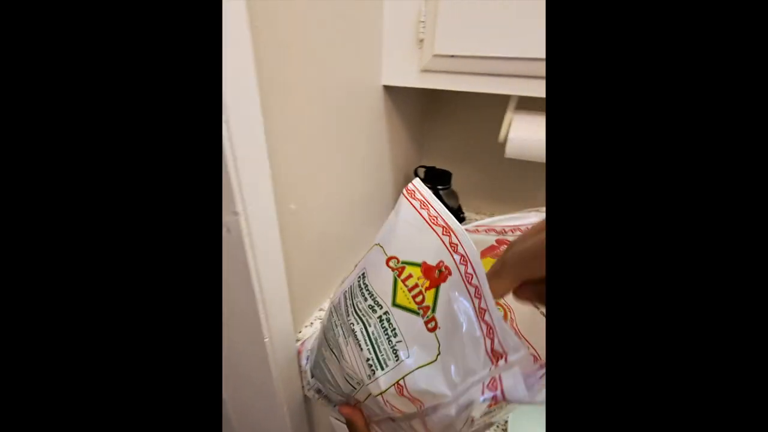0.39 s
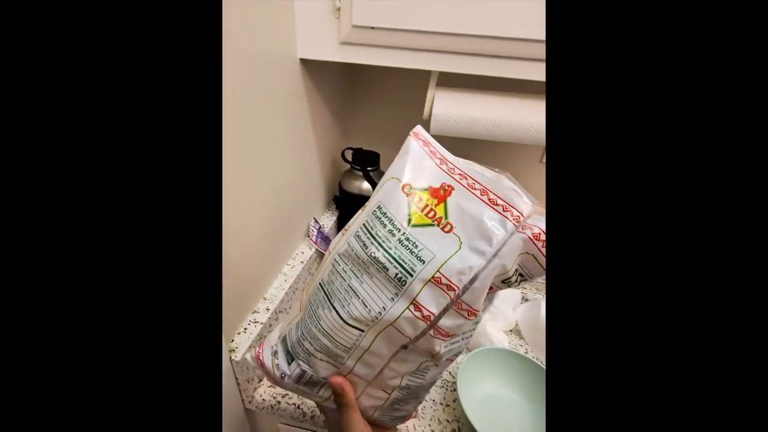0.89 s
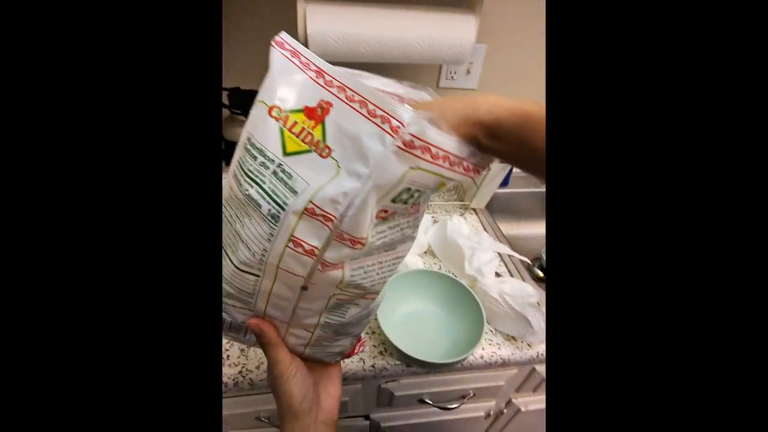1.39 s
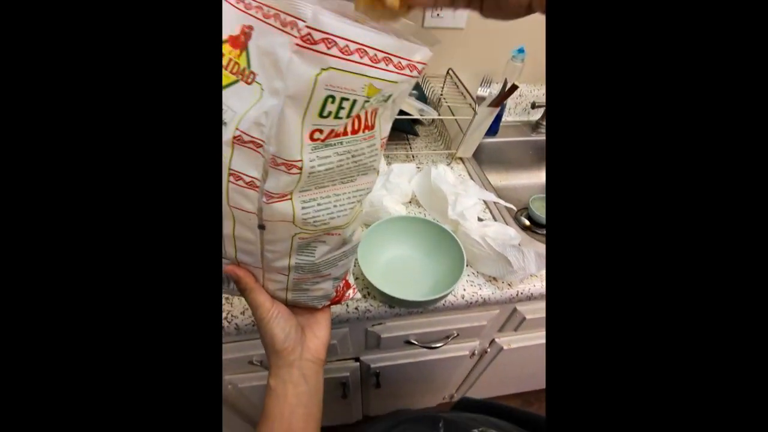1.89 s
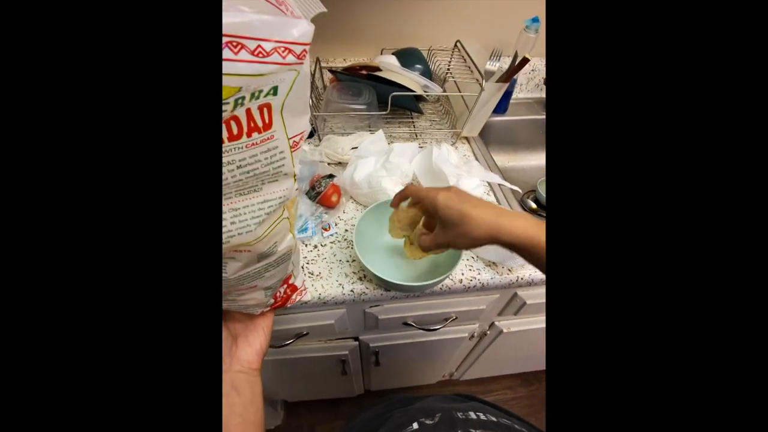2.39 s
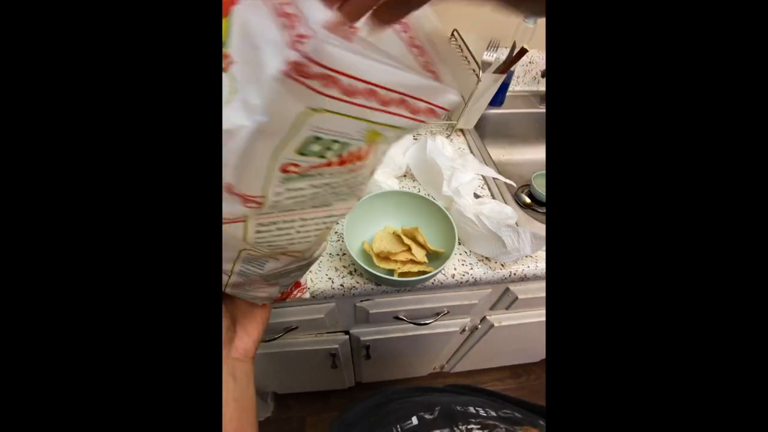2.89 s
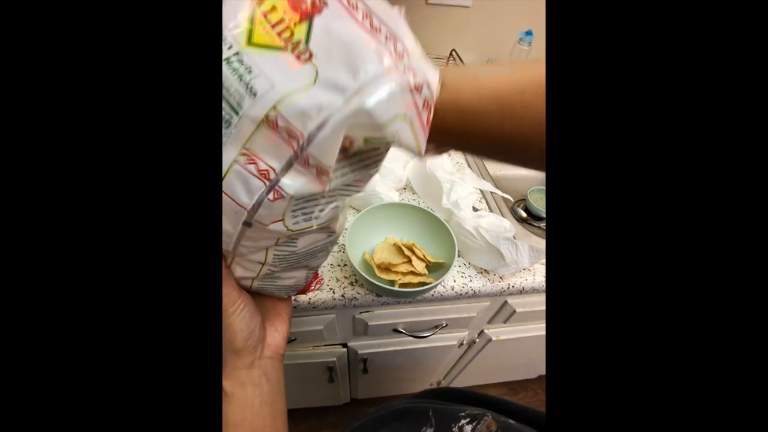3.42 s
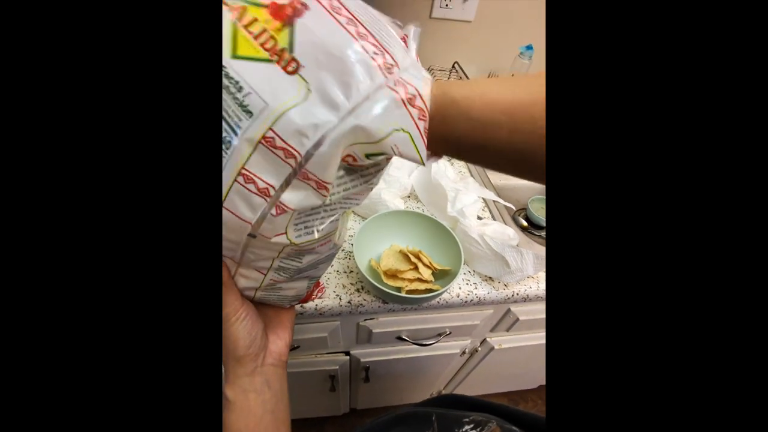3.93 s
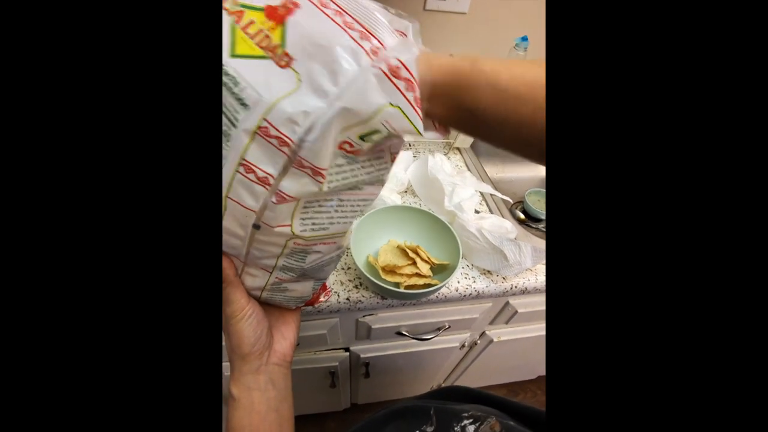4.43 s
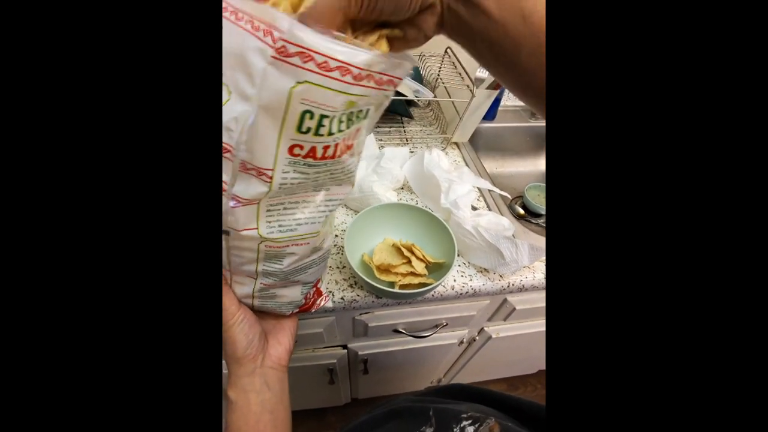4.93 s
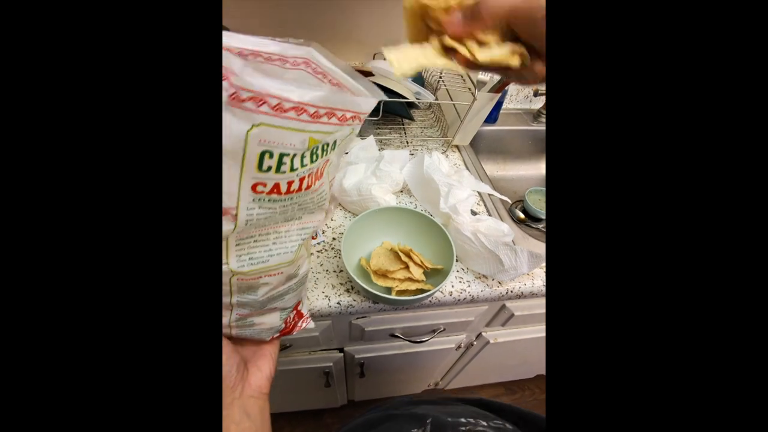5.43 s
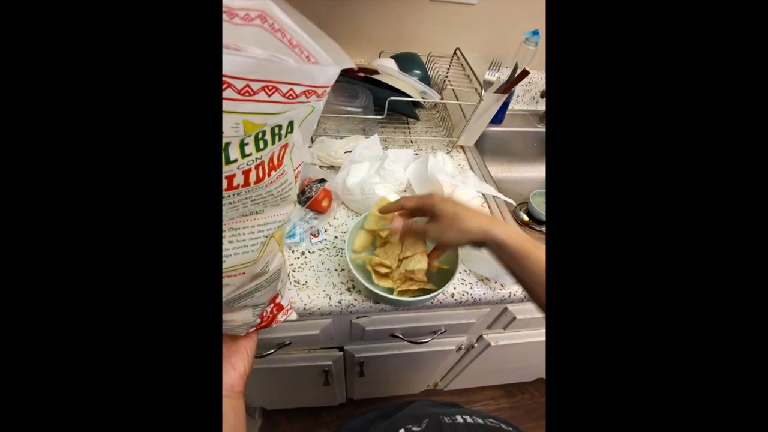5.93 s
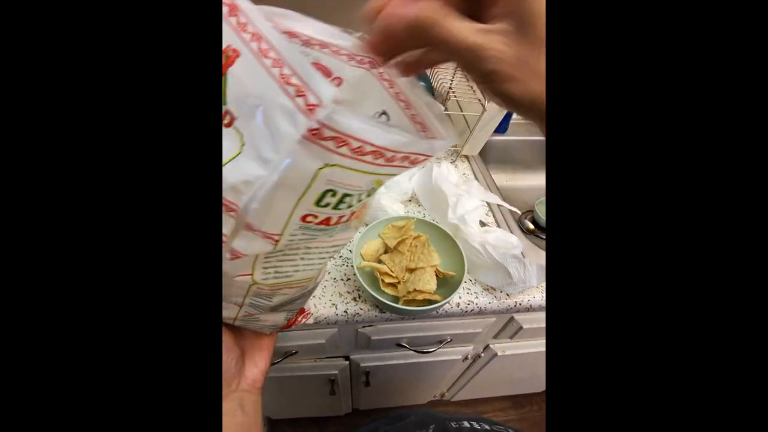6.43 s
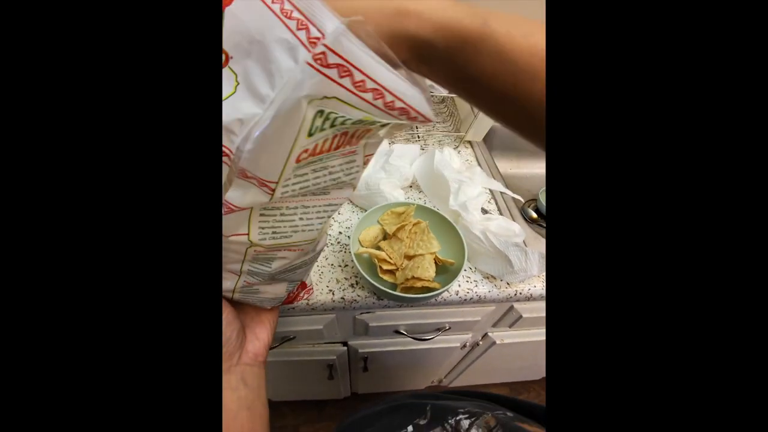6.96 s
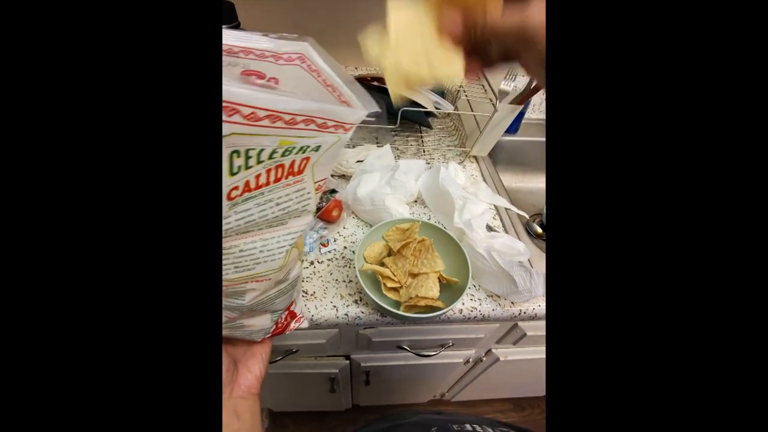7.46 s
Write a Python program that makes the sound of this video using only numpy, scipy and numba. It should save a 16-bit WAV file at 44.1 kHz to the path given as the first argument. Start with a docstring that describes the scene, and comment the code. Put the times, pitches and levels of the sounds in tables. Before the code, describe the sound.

Close to a phone microphone, a hand rummages in a stiff plastic chip bag, crackling and snapping immediately. The rustle thins, then a handful of chips clatters into a bowl with a short hollow ring. A longer, louder dig follows, then a second, lighter drop and more digging. A small hard kitchen adds short reflections over faint low rumble and hiss.

```python
"""Foil crackles and snaps at once: a hand digs in a plastic chip bag held near a phone.
Fine creases, chip rustle and folds are crowds of short decaying sines driven by the hand's moves.
Single snaps and soft knocks stand out; two handfuls of chips clatter and slide in a bowl on a counter,
ringing its modes. A small hard kitchen answers in decaying noise, over a faint low rumble and hiss."""
import sys
import numpy as np
from scipy import signal
from scipy.fft import rfft, irfft
from scipy.io import wavfile
from numba import njit

SR = 44100
rng = np.random.default_rng(int(sys.argv[2]) if len(sys.argv) > 2 else 0)


def to_wav(sig):
    """Store sig (one row per channel, or 1-D mono) as 16-bit WAV at the path in sys.argv[1].

    Samples outside -1..1 are clipped; the rate is SR.
    """
    pcm = np.clip(np.atleast_2d(sig), -1, 1) * 32767
    pcm = np.round(pcm).astype(np.int16)
    wavfile.write(sys.argv[1], SR, pcm.T)  # frames by channels


def gain_from_db(level_db):
    """Turn a decibel level (scalar or array-like) into a linear amplitude factor."""
    decades = np.asarray(level_db, float) / 20
    return 10 ** decades


N = 334278

# moves of the hand in and on the bag; weight: how much a move stirs chips and folds
# full_push_s, hold_s, effort_db, weight_db
MOVES = [(0.018, 0.067, -33.5, 5), (0.137, 0.075, -34.5, 2), (0.26, 0.015, -51, 7),
         (0.33, 0.015, -39, -1.5), (0.39, 0.09, -57, 4.5), (0.53, 0.0038, -39, 3.5), (0.57, 0.052, -35, 2),
         (0.66, 0.059, -38.5, 5.5), (0.76, 0.13, -36, 1), (0.97, 0.034, -32, 1.5),
         (1.045, 0.013, -33.5, -0.5), (1.09, 0.061, -40, -1.5), (1.195, 0.1, -38, -1),
         (1.35, 0.17, -44.5, 0), (1.46, 0.028, -43, 3.5), (1.55, 0.08, -45.5, 3), (1.67, 0.013, -51, -3),
         (1.72, 0.024, -46, -1.5), (1.848, 0.02, -53.5, -23), (2.22, 0.018, -49, 4.5),
         (2.78, 0.069, -54.5, 6), (2.99, 0.063, -50.5, 2.5), (3.1, 0.13, -34.5, 0), (3.25, 0.087, -38, 0),
         (3.37, 0.13, -34, 2), (3.54, 0.17, -42.5, 4.5), (3.66, 0.2, -37.5, 3), (3.85, 0.092, -34, 2.5),
         (3.99, 0.17, -35.5, 0.5), (4.2, 0.075, -40, -1.5), (4.29, 0.12, -33.5, 0),
         (4.44, 0.08, -43.5, 3.5), (4.51, 0.1, -37.5, 0), (4.66, 0.042, -31, 1), (4.78, 0.11, -38, -2.5),
         (4.94, 0.049, -49, 1.5), (5.02, 0.091, -44, 0.5), (5.165, 0.11, -50.5, -2),
         (5.272, 0.016, -44, -1), (5.64, 0.044, -61, 4.5), (5.82, 0.035, -45, -26), (6.02, 0.065, -44.5, 1),
         (6.14, 0.02, -48.5, 0), (6.21, 0.048, -46, 1), (6.33, 0.0055, -48, -2.5), (6.56, 0.026, -45, 3),
         (6.64, 0.032, -33, 2), (6.7, 0.15, -39.5, 4), (6.89, 0.12, -39, 3), (7.05, 0.063, -41.5, 1.5),
         (7.16, 0.017, -42, 2), (7.23, 0.061, -51, -1), (7.29, 0.049, -49.5, 5.5),
         (7.42, 0.0075, -57.5, 5.5), (7.55, 0.022, -56, -21)]


def bag():
    """Foil crackle, ringing creases, chip rustle and low fold thuds follow the effort of hand and chips."""
    rustle_db, crease_db, heap_thud_db = -5, -5.5, -4.5
    fold_db, fold_slope, full_push_db = -42.5, 0.7, -32.5  # folds grow more slowly than the crackle
    bass_left_db = 1.5  # left over right in the fold thuds
    s, hand, heavy = effort(MOVES, rise_db_per_s=425, fall_db_per_s=380, rest_s=np.inf)
    _, chips, heap = handfuls()
    light_db = power_db(hand + chips)
    heavy_db = power_db(heavy + heap)
    push_db = power_db(heavy + heap * gain_from_db(heap_thud_db) ** 2)
    folds_db = fold_db + fold_slope * (push_db - full_push_db)

    push = rng.standard_normal(N // 300)  # random surges shared by all four crowds
    when_s = np.arange(len(push)) * .012
    fine = crackle((s, light_db), 1795, 18000, (when_s, 2.05 * push),
                   cycles=0.41, scatter_db=0.0, count=45000)
    rustle = crackle((s, heavy_db + rustle_db), 357, 2330, (when_s, 2.44 * push),
                     cycles=0.43, scatter_db=1.0, count=14000)
    folds = crackle((s, folds_db), 45, 449, (when_s, 0.5 * push),
                    cycles=0.83, scatter_db=2.0, count=7000)
    creases = crackle((s, light_db + crease_db), 592, 9130, (when_s, 1.9 * push),
                      cycles=1.8, scatter_db=3.5, count=1800)
    thuds = alike(folds, 35) * gain_from_db(np.array([[.5], [-.5]]) * bass_left_db)
    return (fine + rustle + creases) * hush() + thuds


# handfuls let go into the bowl, sliding to rest
# full_effort_s, slide_s, effort_db, weight_db
HANDFULS = [(2.526, 0.09, -33, 5.5), (5.858, 0.043, -28.5, -1.5)]


def handfuls():
    """Effort of the falling chips: abrupt onset, slow settling, then a faster fade at rest."""
    return effort(HANDFULS, rise_db_per_s=6994.5, fall_db_per_s=120, rest_s=.33)


def effort(rows, rise_db_per_s, fall_db_per_s, rest_s):
    """Power of the moves in time, plain and weighted: each builds, holds and dies away."""
    rest_fall_db_per_s = 380  # added to the fall after rest_s
    t = np.arange(0, N / SR + .002, .002)
    s, hold_s, db, weight_db = np.transpose(rows)[:, :, None]
    before_s = np.maximum(s - t, 0)
    after_s = np.maximum(t - s - hold_s, 0)
    fall_db = fall_db_per_s * after_s + rest_fall_db_per_s * np.maximum(after_s - rest_s, 0)
    power = gain_from_db(db - rise_db_per_s * before_s - fall_db) ** 2
    return t, power.sum(0), (power * gain_from_db(weight_db) ** 2).sum(0)


def power_db(power):
    """Power in dB, floored at -100."""
    return 10 * np.log10(power + 1e-10)


# spectrum of bag and microphone together
# freq_hz, density_db (per Hz, relative)
COLOUR = [(20, -63.5), (32, -12), (100, -4.5), (280, -8), (410, -3), (770, -1), (1240, -4.5), (3050, -3),
          (4180, -9), (5300, -1.5), (6900, -6), (8500, -14), (12500, -17), (15000, -15), (16500, -43.5)]


def crackle(curve, lo_hz, hi_hz, surge, count, cycles, scatter_db):
    """A dense crowd of pops in one range, coming in surges; scatter sets how far sizes differ."""
    s, pitch, big, sign = rng.random((count, 4)).T
    side, pan = rng.standard_normal((count, 2)).T
    s = s * N / SR
    hz = lo_hz * (hi_hz / lo_hz) ** pitch
    size_db = -scatter_db * np.log(big + 8e-3) + np.interp(s, *surge)
    size = hz * gain_from_db(size_db) * np.sign(sign - .5)
    pan_db = place(s)[0] + 3.65 * pan
    crowd = colour(pops(s, hz, cycles, size, pan_db, side), COLOUR)
    crowd = band(crowd, lo_hz, hi_hz)
    return level(crowd, 0) * gain_from_db(np.interp(np.arange(N) / SR, *curve) + 1.5)


def hush():
    """Gain of the taut foil: it dips by up to 4.5 dB just before each snap."""
    t = np.arange(N) / SR
    snap_s = np.append(np.transpose(SNAPS)[0], np.inf)
    ahead_s = snap_s[np.searchsorted(snap_s, t)] - t
    return gain_from_db(-4.5 * np.exp(-ahead_s / .012))


# single loud snaps of foil and chips; levels relative
# start_s, level_db, pitch_hz, body_db (re level), edge_db (tilt of the spray to high pitch)
SNAPS = [(0.059, -20, 1130, -22, -30), (0.1358, -14.5, 3260, -10.5, -24.5), (0.329, -17, 1210, -7, -8),
         (0.5154, -27.5, 2180, -5, -12), (0.5372, -21.5, 6750, -20, -14.5), (0.559, -18, 6740, -26, -20),
         (0.575, -22, 2130, -22, -7), (0.6123, -15, 3080, -11, -25), (0.6813, -19.5, 2170, -33, -7.5),
         (0.772, -21.5, 5500, -19, -24), (0.7944, -26.5, 5430, -12, -11), (0.8408, -28.5, 5310, -1, -6),
         (0.8987, -19, 6350, -8.5, -16), (0.975, -14.5, 5010, -30, -22), (0.9798, -16, 5760, -38, -15),
         (0.9973, -17.5, 5600, -4.5, -19), (1.045, -21.5, 4550, -12, -14), (1.053, -10.5, 5530, -35, -25),
         (1.2578, -27.5, 1710, -6, -26), (1.4891, -22, 4500, -20, -27), (1.858, -30.5, 3770, -47.5, -21.5),
         (2.1944, -38.5, 1940, -27, -9), (2.2168, -33.5, 3300, -20, -12), (2.297, -40.5, 2530, -25, -30),
         (2.522, -24, 5500, -2, -38), (2.5735, -11.5, 2060, -6, -17), (2.621, -25.5, 5300, -20, -35),
         (2.6403, -18, 5600, -18, -34), (2.651, -19.5, 3280, 1.5, -19), (3.0895, -9, 3060, -37, -27),
         (3.1065, -6, 2450, -40, -19), (3.162, -17.5, 2290, -21, -14), (3.1823, -18, 4950, -23, -7),
         (3.255, -11.5, 5800, -32, -32), (3.3742, -13, 1890, -41, -14), (3.3795, -15, 5660, -39, -32),
         (3.4527, -19, 1980, -19, -14), (3.464, -21.5, 5800, -5, -12.5), (3.4944, -18, 5660, -12.5, -14.5),
         (3.842, -21, 2120, -12, -37), (3.8565, -10, 5300, -26, -34), (3.87, -18.5, 5330, -26, -16.5),
         (3.895, -25.5, 5350, -20, -11), (3.9157, -21, 6000, -24, -24), (3.938, -11.5, 5840, -13.5, -59),
         (4.0425, -15.5, 5400, -12, -35), (4.3752, -19, 5400, -19, -20), (4.5783, -17, 5140, -28, -12.5),
         (4.598, -26, 4670, -5, -9), (4.6437, -19.5, 5200, -12, -27), (4.666, -26, 6000, -21, -17),
         (4.6732, -12.5, 5740, -9, -18), (4.7006, -19, 5090, -7, -38), (4.7987, -22, 6060, -11, -17),
         (4.8415, -13.5, 5600, -43, -22.5), (4.8457, -12, 5080, -35, -21.5), (5.0268, -30, 5300, -25, -17),
         (5.2163, -33.5, 6340, -25, -14), (5.263, -39.5, 6700, 3, -0.5), (5.7719, -30.5, 4830, -39, -18),
         (5.8544, -15, 2980, -8, -23), (5.8967, -13, 5370, -15, -21), (5.937, -20, 3120, -25, -38),
         (5.9645, -25, 3600, -13, -40), (6.046, -24, 3600, -27, -34), (6.25, -28, 2930, -17, -10),
         (6.3328, -18.5, 3150, -22, -40), (6.4253, -31, 3100, -18, -32), (6.6274, -13.5, 5930, -28, -37),
         (6.666, -10.5, 2300, -18, -18), (6.7385, -14.5, 7000, -14, -19.5), (6.843, -18.5, 5700, -14, -22),
         (6.9647, -18.5, 5700, -10, -29), (7.0402, -19.5, 5400, -12, -22), (7.1655, -24, 1980, -3.5, -35),
         (7.18, -30, 6000, -25, -25), (7.281, -23.5, 5030, -14, -25), (7.311, -26, 2650, -1.5, -29),
         (7.36, -30.5, 1950, -6.5, -20)]


def snaps():
    """Each snap: a briefly ringing panel, a spray of smaller creases and a duller push of air."""
    s, db, hz, body_db, edge_db = np.transpose(SNAPS)
    side, dull = rng.random((len(s), 2)).T
    side = 0.91 * (side - .5)
    pan_db = place(s)[0] - 9 * side
    panel = pops(s, hz, 1.8, gain_from_db(db + 7.0), pan_db, side, rise_cycles=1.5)
    body_hz = 500 * 2 ** (0.86 * dull)
    body = pops(s, body_hz, 1.34, gain_from_db(db + body_db + 4.5), pan_db, side)

    wait, lead, pitch, sign = rng.random((len(s), 4, 40)).transpose(1, 0, 2)
    pitch = (np.arange(40) + pitch) / 40  # spread evenly from low to high
    # creases gather over a millisecond or so, then thin out
    late_s = -.0011 * np.log(wait + 1e-3) + .0004 * np.log(lead + 1e-2) + .0006
    crease_hz = 2000 * 8 ** pitch
    apart_db = -4.0 * np.abs(np.log2(crease_hz / hz[:, None]))  # favours the panel's pitch
    tilt_db = (edge_db[:, None] + 48.5) * pitch
    size_db = db[:, None] - 4.5 - 700 * np.abs(late_s) + tilt_db + apart_db
    size = gain_from_db(size_db) * np.sign(sign - .5)
    spray = pops((s[:, None] + late_s).ravel(), crease_hz.ravel(), 1.0, size.ravel(),
                 np.repeat(pan_db, 40), np.repeat(side, 40))
    return panel + body + colour(spray, COLOUR)


# soft knocks of the full bag against the hand; levels relative
# start_s, level_db, pitch_hz
KNOCKS = [(0.077, -31.5, 1110), (0.148, -29.5, 406), (1.474, -32.5, 427), (1.518, -28, 119),
          (1.632, -36, 125), (1.726, -40, 330), (2.2225, -37.5, 736), (2.227, -38.5, 398), (3.13, -23, 102),
          (3.449, -25, 100), (4.68, -30, 106), (4.924, -37, 105), (5.084, -38, 140), (5.11, -39, 403),
          (5.87, -28.5, 250), (5.899, -30, 124), (6.217, -38, 293), (6.256, -38, 263), (7.168, -37.5, 287),
          (6.66, -21, 105), (7.312, -27.5, 188), (7.42, -39, 260)]


def knocks():
    """Dull thuds, one decay time for all: deep ones last about a cycle, higher ones ring a few."""
    decay_s = 0.0083
    s, db, hz = np.transpose(KNOCKS)
    return pops(s, hz, hz * decay_s, gain_from_db(db + 4.0), 0 * s, 0 * s)


# chips landing in the bowl; levels relative
# start_s, level_db, ring_hz (strongest)
DROPS = [(2.5232, -27, 865), (2.547, -17.5, 1520), (2.5744, -9, 1040), (2.5777, -7.5, 1520),
         (2.584, -1, 900), (2.5895, -26, 875), (2.623, -18, 877), (2.652, -20, 1520), (2.679, -23, 530),
         (2.695, -25, 650), (2.707, -26.5, 665), (5.8658, -10.5, 810), (5.9, -15, 1900),
         (5.9102, -13, 2140), (5.9194, -11, 2320), (5.965, -26, 840), (6.074, -29, 870), (6.142, -27, 850)]
# ringing modes of the bowl; levels relative
# mode_hz, level_db, t60_s
BOWL = [(515, -7, 0.16), (650, -10, 0.16), (885, -9, 0.07), (1040, -12, 0.07), (1518, -5, 0.14),
        (1880, -2, 0.06), (2130, -3, 0.07), (3190, -7, 0.05)]


def bowl():
    """Each landing chip strikes the modes, most those near its own ring, each shifted a little at random."""
    s, db, ring_hz = np.transpose(DROPS)
    hz, mode_db, t60_s = np.transpose(BOWL)
    share, shift = rng.standard_normal((len(s), 2, len(hz))).transpose(1, 0, 2)
    apart_db = 16.0 * np.abs(np.log2(hz / ring_hz[:, None]))
    size = gain_from_db(db[:, None] + mode_db - 10.0 + 1.2 * share - apart_db).ravel()
    shifted_hz = (hz * (1 + .007 * shift)).ravel()
    cycles = np.tile(hz * t60_s / np.log(1000), len(s))
    centre = np.zeros(len(size))
    ring = pops(np.repeat(s, len(hz)), shifted_hz, cycles, size, centre, centre, rise_cycles=0.94)
    clack = pops(s, ring_hz, 0.94, gain_from_db(db + 1.0), 0 * s, 0 * s)  # the blow itself
    return ring + clack


def slide():
    """Chips sliding over the bowl keep its modes humming through many small random strikes."""
    ring_db = -18
    s, _, heap = handfuls()
    when_s, mode, big = rng.random((2500, 3)).T
    hz, mode_db, t60_s = np.array(BOWL)[(mode * len(BOWL)).astype(int)].T
    when_s = when_s * N / SR
    heap_db = np.interp(when_s, s, power_db(heap))
    size = gain_from_db(heap_db + ring_db + mode_db - 6.9 * np.log(big + 0.0075))
    return pops(when_s, hz, hz * t60_s / np.log(1000), size, 0 * hz, 0 * hz, rise_cycles=0.63)


# where the hand works, right to left of the phone
# time_s, bearing (-1 to 1)
BEARING = [(0, -0.1), (2.75, 0.029), (3.75, 0.41), (4.75, 0.46), (5.3, 0.54), (5.75, 0.049), (6.25, -0.12),
           (6.75, 0.25), (7.25, 0.35)]


def place(s):
    """Bearing gives the level of left over right (dB) and the lag of the left port (s)."""
    ports_ms, centre_db, shadow_db = 0.43, -0.5, 3.5
    bearing = np.interp(s, *np.transpose(BEARING))
    return centre_db + shadow_db * bearing, -ports_ms / 1000 * bearing


def pops(s, hz, cycles, size, pan_db, side, rise_cycles=0.49):
    """Pops that ring a few cycles; their place on the bag sets the lag between the two ports."""
    port_spread_s = .00015
    lag_s = place(s)[1] + port_spread_s * side
    start = (s[:, None] + lag_s[:, None] * [.5, -.5]) * SR
    sizes = size[:, None] * gain_from_db(pan_db[:, None] * [.5, -.5])
    return rings(N, start, hz / SR, hz / SR / cycles, hz / SR / rise_cycles, sizes)


@njit
def rings(count, start, hz, decay, rise, size):
    """Damped sines that swell in quickly; hz, decay and rise per sample, start and size per channel."""
    out = np.zeros((2, count))
    for k in range(len(hz)):
        p = np.exp(2j * np.pi * hz[k] - decay[k])
        q = np.exp(-rise[k])
        for c in range(2):
            i = int(np.ceil(start[k, c]))
            late = i - start[k, c]  # keeps starts exact between samples
            z = size[k, c] * p ** late
            w = q ** late
            for j in range(max(i, 0), min(count, i + int(6 / decay[k]))):
                out[c, j] += z.imag * (1 - w)
                z *= p
                w *= q
    return out


def level(x, db):
    """Scale to an rms level."""
    return x * gain_from_db(db) / np.sqrt(np.mean(x ** 2))


def colour(x, points):
    """Causal minimum-phase filter through (Hz, dB) points."""
    hz, db = np.transpose(points)
    grid_hz = np.arange(2049) * SR / 4096
    log_gain = np.interp(np.log(grid_hz + 1), np.log(hz), db) * np.log(10) / 20
    cepstrum = irfft(log_gain)
    cepstrum[1:2048] *= 2
    cepstrum[2049:] = 0
    impulse = irfft(np.exp(rfft(cepstrum)))
    return signal.fftconvolve(x, impulse[None], axes=1)[:, :N]


def band(x, lo_hz, hi_hz):
    """Band-pass."""
    return signal.sosfilt(signal.butter(2, [lo_hz, hi_hz], "band", fs=SR, output="sos"), x)


def alike(x, hz):
    """Long waves reach both ports alike: below hz the difference fades."""
    mid, side = (x[0] + x[1]) / 2, (x[0] - x[1]) / 2
    side = signal.lfilter(*signal.butter(1, hz, "high", fs=SR), side)
    return np.array([mid + side, mid - side])


def room(x):
    """Counter and cupboards close by, then the kitchen: decaying noise echoes in a drifting random mix."""
    t = np.arange(SR // 3) / SR
    shape = 0
    for t60_s, db, first_s in ((.045, -7.5, .0015), (.19, -12, .006)):  # near, whole room
        fade = 1000. ** (-2 * t / t60_s) * (t > first_s)
        shape = shape + fade * gain_from_db(db) ** 2 / np.sum(fade)
    echoes = rng.standard_normal((4, 2, len(t))) * np.sqrt(shape)

    step_s = np.arange(0, N / SR + .1, .04)
    share = np.array([np.interp(np.arange(N) / SR, step_s, rng.standard_normal(len(step_s)))
                      for _ in range(4)])
    share = share / np.sqrt(np.sum(share ** 2, axis=0))
    wet = 0
    for weight, echo in zip(share, echoes):
        sent = (x.mean(0) * weight)[None]
        wet = wet + signal.fftconvolve(sent, echo, axes=1)[:, :N]
    wet = signal.lfilter(*signal.butter(1, 7000, fs=SR), wet)  # soft surfaces dull the echoes
    return x + alike(wet, 1200)


# spectrum of the house's background noise
# freq_hz, density_db (per Hz, relative)
KITCHEN = [(18, -40.5), (30, -14), (76, -5.5), (150, -16.5), (185, -9.5), (206, -17.5), (467, -27.5),
           (1700, -33), (6550, -36.5), (9000, -45.5), (15000, -48), (16500, -69)]


def kitchen():
    """Faint low rumble and hiss of the house: coloured noise."""
    rms_db = -58
    noise = colour(rng.standard_normal((2, N)), KITCHEN)
    return level(alike(noise, 600), rms_db)


def scene():
    """Bag and bowl in the kitchen."""
    return room(bag() + snaps() + knocks() + bowl() + slide()) + kitchen()


def band_limit(x):
    """A steep low-pass at the top of the band."""
    return signal.sosfilt(signal.butter(12, 16800, fs=SR, output="sos"), x)


def record(dry):
    """The phone cuts the deepest bass and the top; its port's cavity dips the treble near 10 kHz."""
    mix = signal.sosfilt(signal.butter(2, 30, "high", fs=SR, output="sos"), dry)
    mix = mix - 1.07 * signal.lfilter(*signal.iirpeak(10450, 5.0, fs=SR), mix)
    mix = signal.sosfilt(signal.ellip(8, .2, 70, 16600, fs=SR, output="sos"), mix)
    return band_limit(mix)


dry = scene()
out = record(dry)
to_wav(out)
```